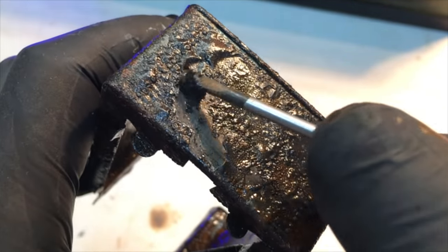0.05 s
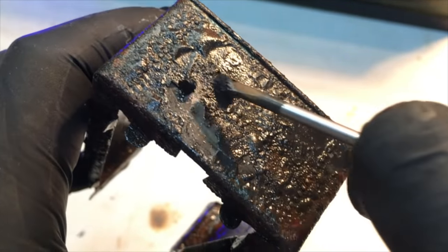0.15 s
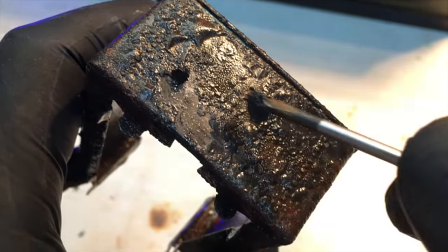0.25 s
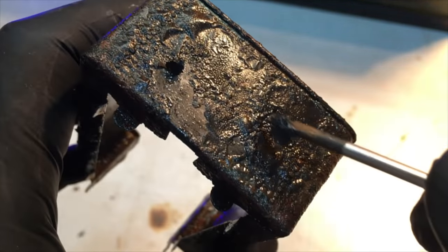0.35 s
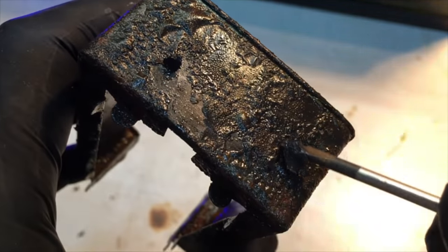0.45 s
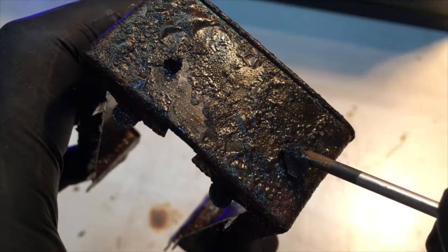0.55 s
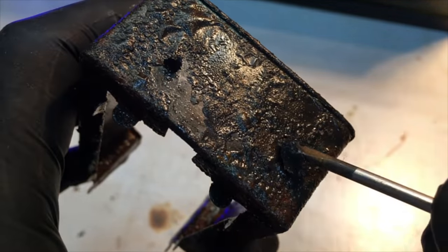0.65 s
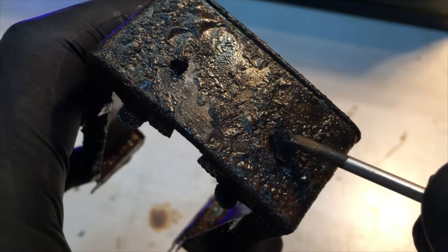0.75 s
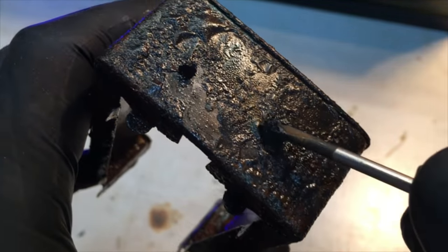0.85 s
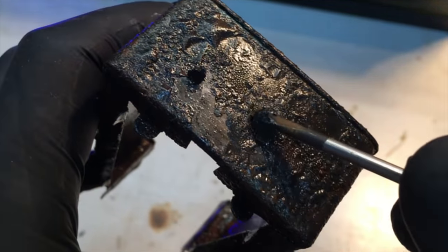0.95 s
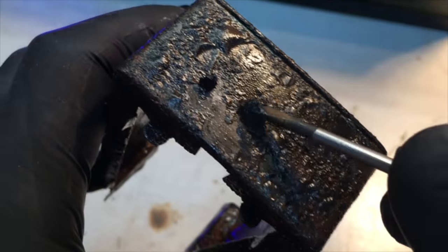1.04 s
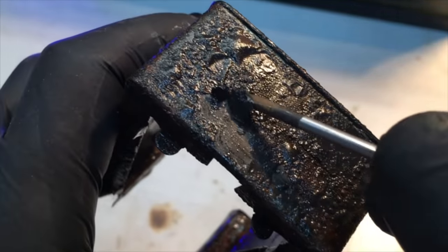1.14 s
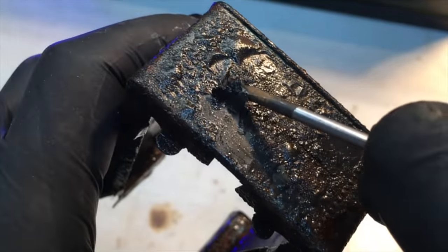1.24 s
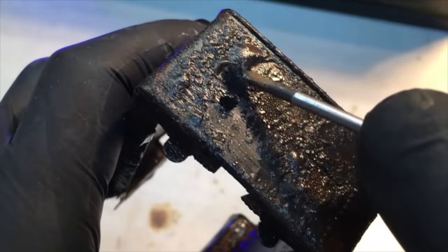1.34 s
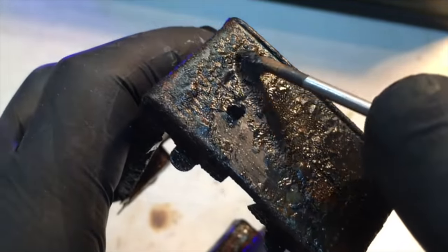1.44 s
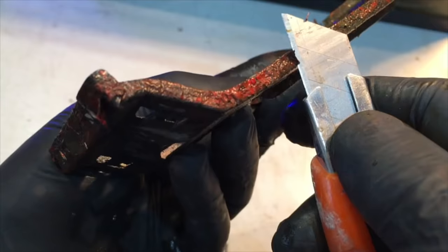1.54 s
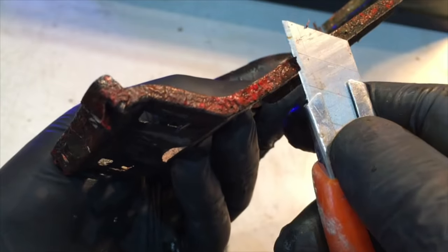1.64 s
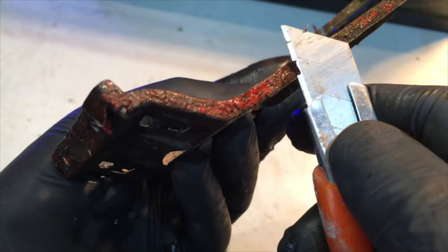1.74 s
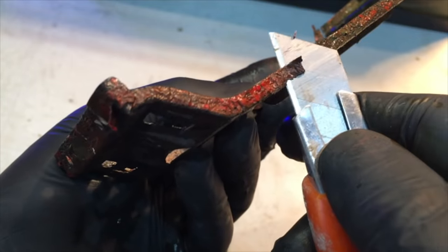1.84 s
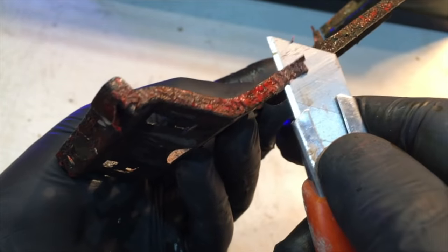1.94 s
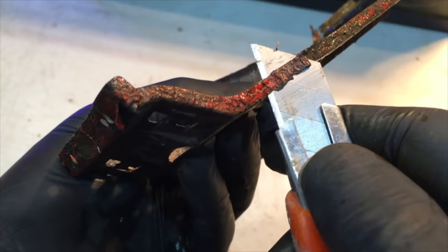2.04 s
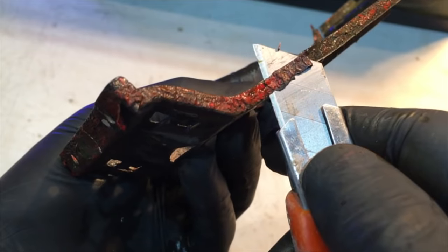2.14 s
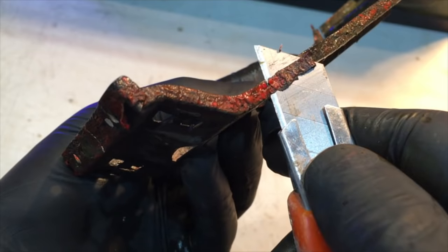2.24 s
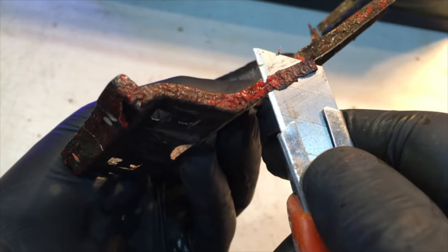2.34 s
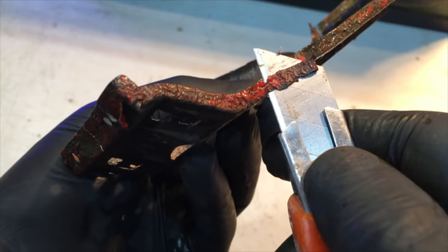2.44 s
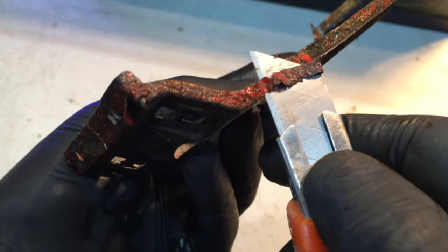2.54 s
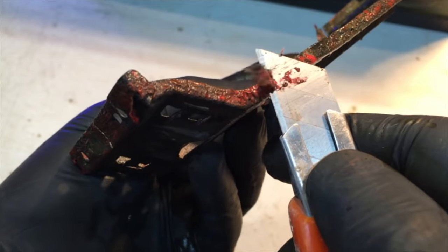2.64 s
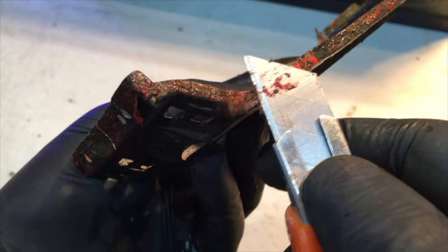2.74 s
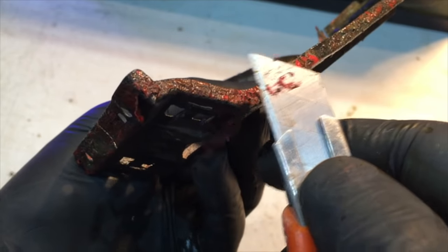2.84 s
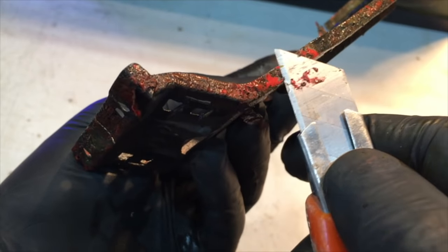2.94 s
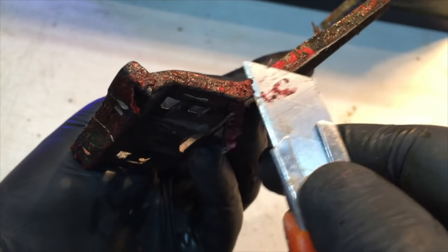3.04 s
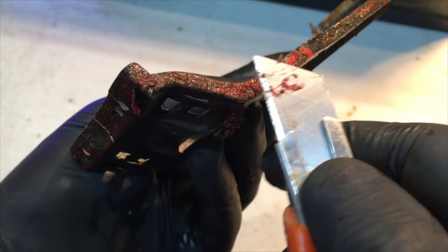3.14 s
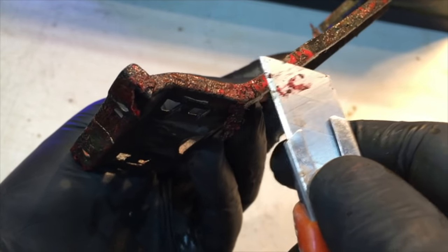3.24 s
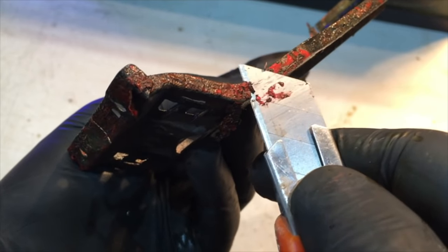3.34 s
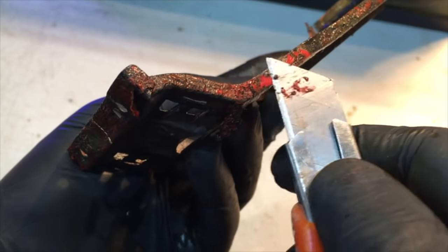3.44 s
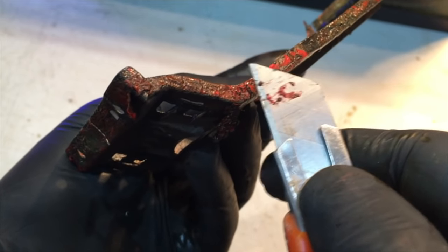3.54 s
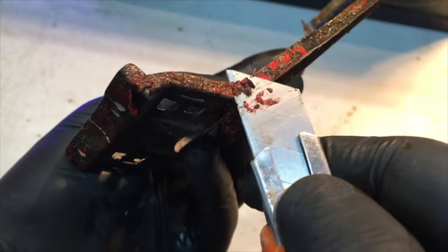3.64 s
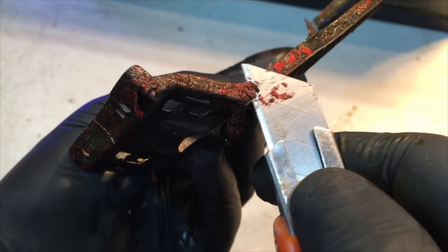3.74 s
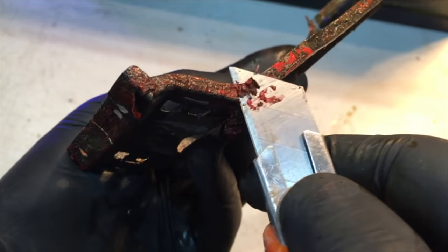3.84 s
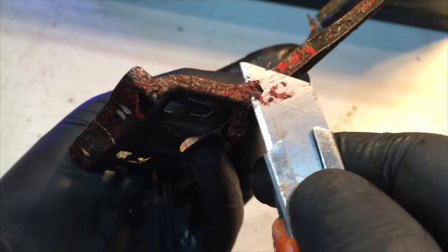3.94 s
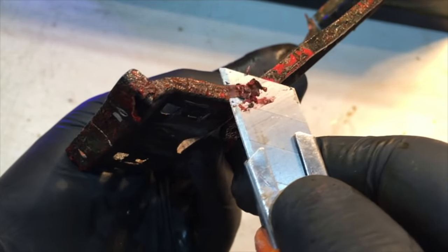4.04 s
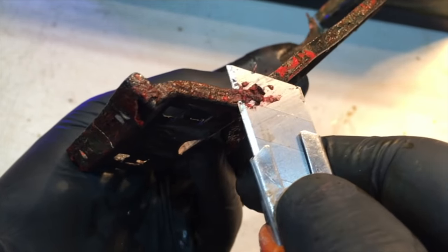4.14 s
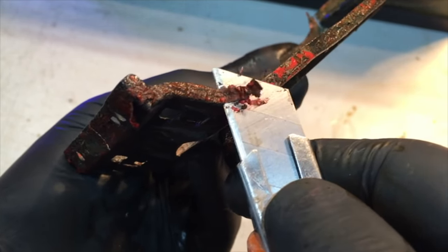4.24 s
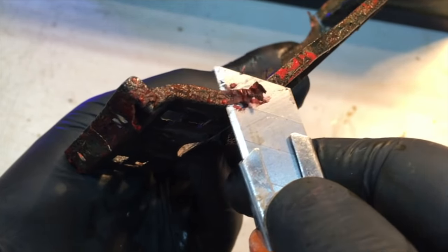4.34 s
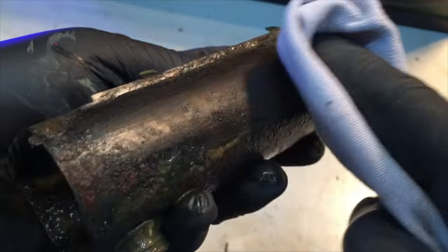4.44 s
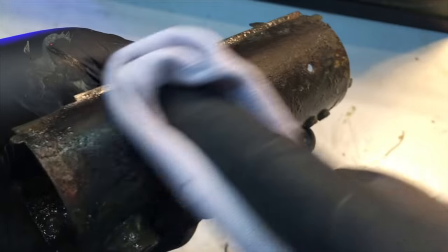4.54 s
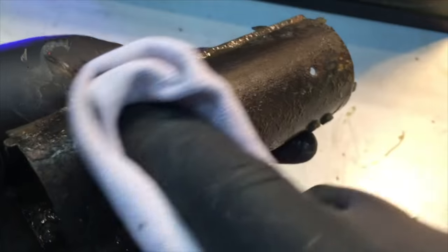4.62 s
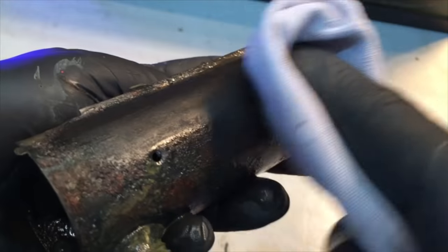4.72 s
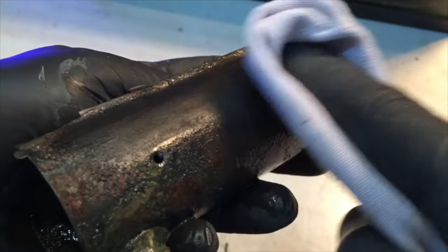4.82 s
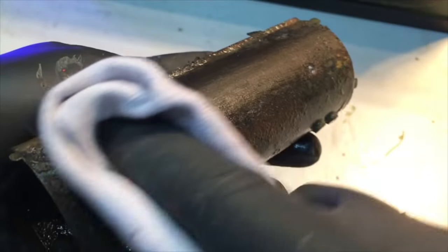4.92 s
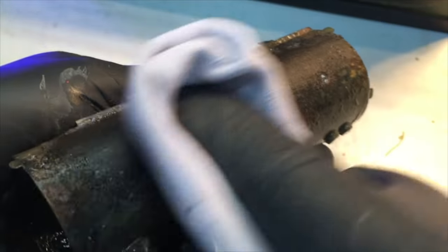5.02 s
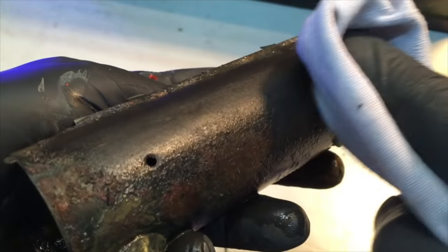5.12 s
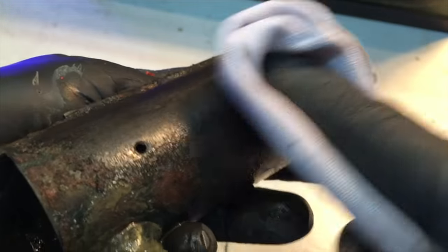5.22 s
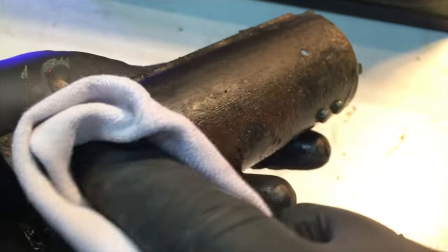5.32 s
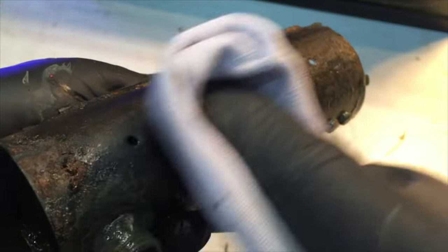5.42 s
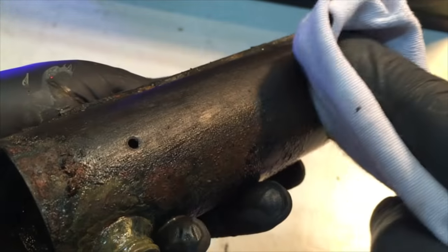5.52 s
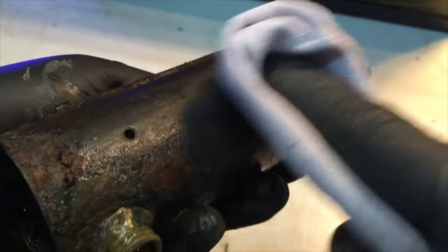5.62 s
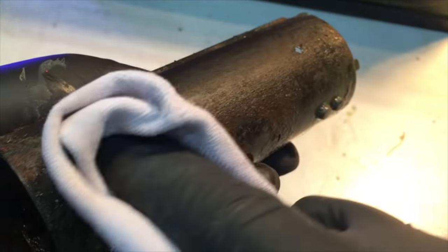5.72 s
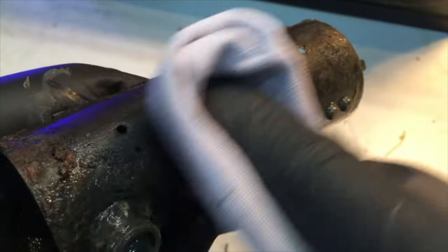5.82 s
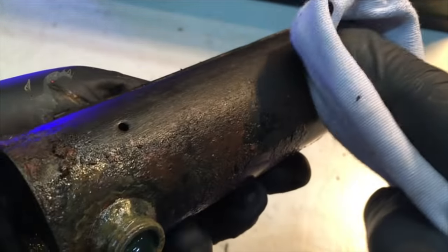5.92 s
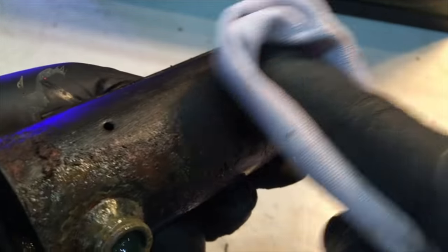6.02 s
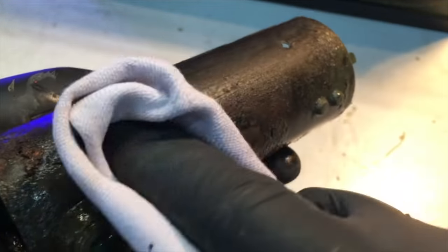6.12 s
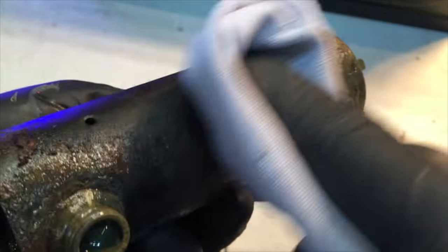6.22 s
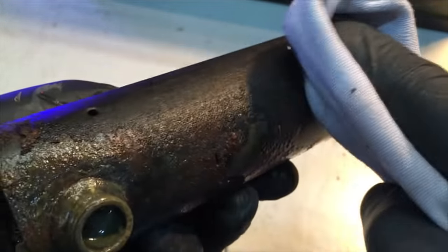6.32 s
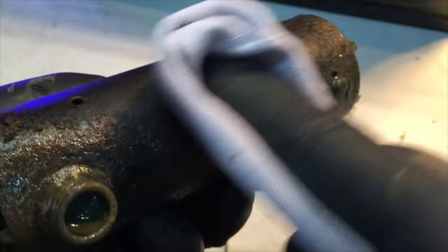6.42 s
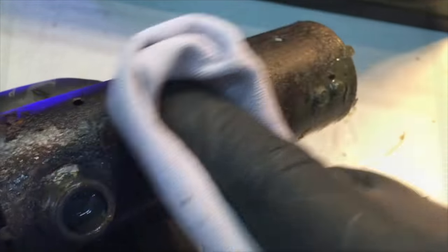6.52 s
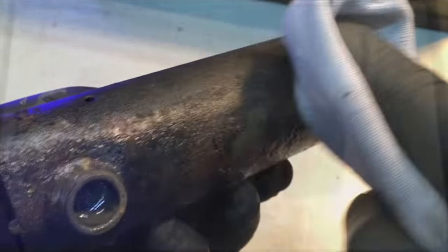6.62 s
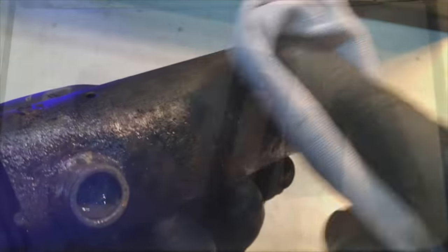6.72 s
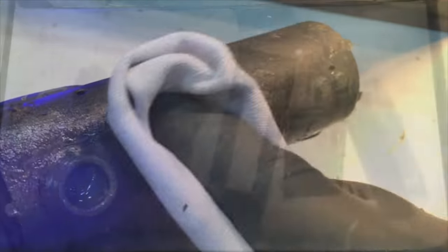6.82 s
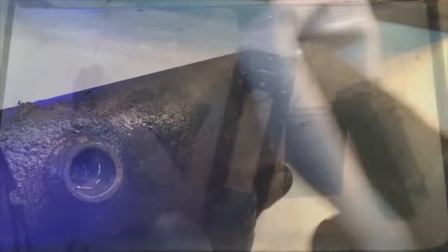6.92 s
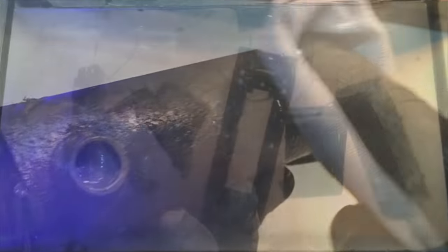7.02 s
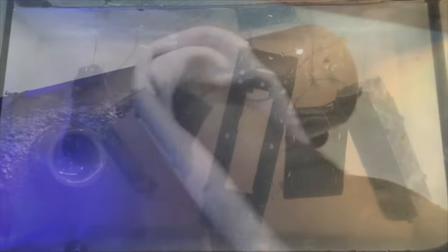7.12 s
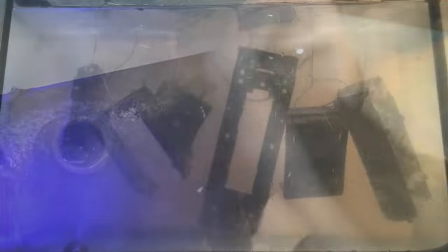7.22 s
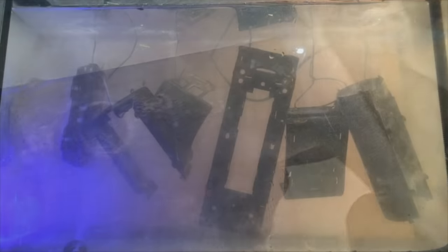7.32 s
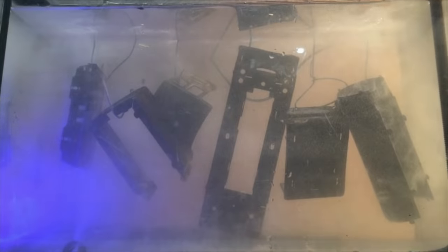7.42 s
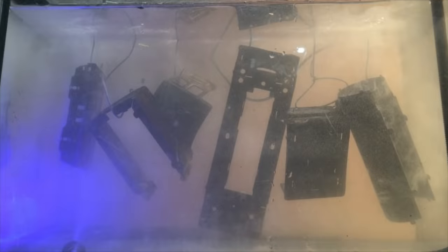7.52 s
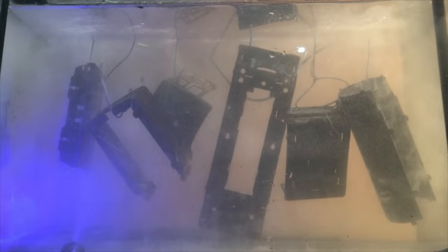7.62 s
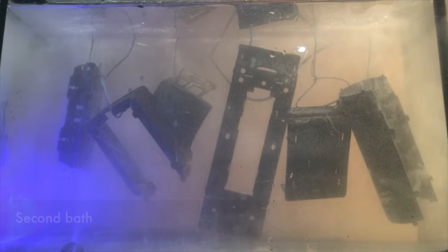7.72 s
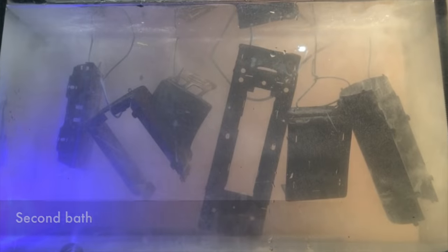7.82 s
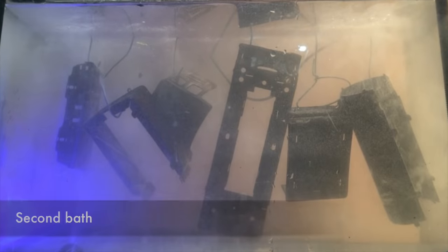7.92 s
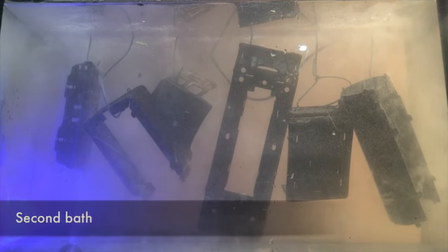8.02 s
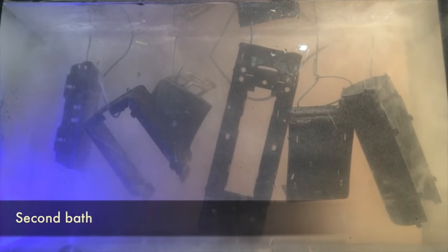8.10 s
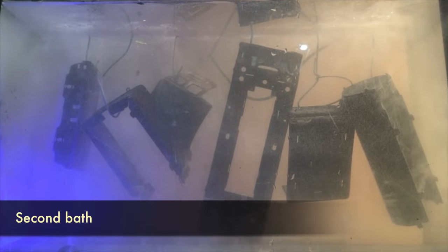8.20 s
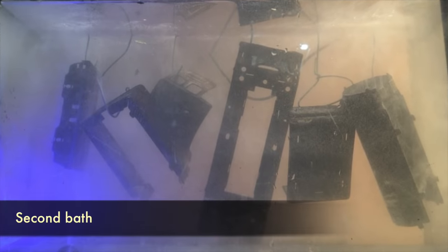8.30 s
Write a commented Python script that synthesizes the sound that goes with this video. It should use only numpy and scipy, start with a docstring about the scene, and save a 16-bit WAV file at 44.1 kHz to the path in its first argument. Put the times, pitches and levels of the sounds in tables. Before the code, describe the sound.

Dry, close bench sounds with little room echo: a stiff brush rubs and crackles on rusty metal, then a knife blade catches, judders and snaps through crust in uneven scratches. Next a rag swishes briskly to and fro along a rough tube, hissing with soft thumps. It dissolves into quiet background noise, tiny bursting bubbles and a wavering low hum with a faint high whine.

```python
"""A small workshop bench, close to one microphone: rusty metal parts are cleaned in three ways, then bathed.
A stiff brush works on blistered paint, its even rub ringing the plate, its catching bristles crackling. A blade
scrapes an edge in short slips of dense fractures, with sharp cracks. A rag scrubs a tube in bright pushes and heavier
pulls, its thread noise following hand speed; it fades into a rust bath of random fizz over noise and wavering hum."""
import sys
import numpy as np
from scipy import signal
from scipy.fft import rfft, irfft
from scipy.io import wavfile
from scipy.ndimage import map_coordinates

SR = 44100
rng = np.random.default_rng(int(sys.argv[2]) if len(sys.argv) > 2 else 0)


def master_out(mix):
    """Clip the mix to full scale and print it as 16-bit PCM to the path in sys.argv[1]."""
    frames = np.transpose(np.atleast_2d(mix))
    ceiling = np.clip(frames, -1, 1)
    pcm = np.round(ceiling * 32767).astype(np.int16)
    wavfile.write(sys.argv[1], SR, pcm)


N = 368676
TIME_S = np.arange(N) / SR
HZ = np.fft.rfftfreq(8192, 1 / SR)

# Stage times in seconds: blade starts, rag starts, fade to the bath starts, fade ends.
STAGE_TIMES_S = (1.55, 4.45, 6.55, 7.45)

# Background noise spectra of the four stages. Each row: frequency in Hz, relative density in dB per Hz.
BRUSH_AIR = [(8, -36), (25, -1.5), (52, -2), (163, -17), (500, -25.5), (900, -25.5), (1600, -23.5),
             (2100, -26), (3700, -27.5), (4900, -32.5), (9600, -35), (10400, -38), (12000, -35),
             (16000, -36)]
BLADE_AIR = [(8, -33), (25, 2.5), (45, 0.5), (75, -3), (135, -14), (220, -19.5), (330, -19), (700, -25.5),
             (2500, -26), (5000, -31.5), (16000, -36)]
RAG_AIR = [(20, 4), (35, -2), (100, -15), (200, -14), (1000, -24), (4000, -37), (16000, -36)]
BATH_AIR = [(12, -38), (20, 5), (60, -7.5), (101, 0), (130, -19), (216, -17), (262, -20.5), (660, -26.5),
            (825, -24.5), (2390, -27.5), (2670, -29), (3070, -22.5), (3740, -26.5), (6010, -31),
            (16000, -33)]
# Spectrum of the bath's bursting bubbles. Each row: frequency in Hz, relative gain in dB.
FIZZ = [(600, -28), (1300, 4.5), (2000, 5.5), (3200, -1), (4900, -10), (5900, 4), (7700, -7), (9300, 1.5),
        (10400, -8), (12000, -2), (16000, -16)]
# Steady tones at the bench and the bath. Each row: frequency in Hz, nominal rms level in dB.
BENCH_HUM = [(76.5, -71.5), (101.5, -75.5), (152.3, -76.5), (203, -87), (305, -84)]
BATH_HUM = [(32.3, -74.5), (102.3, -74.5), (222, -88), (2358, -78.5), (3144, -83), (3235, -105),
            (3435, -87)]

# Spectra of the cloth's threads and of the hand's thump. Each row: frequency in Hz, relative gain in dB.
RAG_THREADS = [(150, -42.5), (400, -17), (650, -17), (1200, -8.5), (1850, -8), (2700, -2), (4100, -2.5),
               (4880, -7), (5800, 4.5), (6700, 0), (9300, 1.5), (10400, -3), (11400, 0.5), (16000, 0)]
THUMP = [(30, -31), (70, 6), (110, 4.5), (170, -1.5), (250, 1.5), (400, -8.5), (700, -48), (2000, -56)]
# Starts of the rag's strokes in seconds, and the end of the last; pushes and pulls alternate, push first.
TURNS_S = [4.45, 4.634, 4.806, 4.99, 5.181, 5.37, 5.576, 5.774, 5.977, 6.168, 6.352, 6.529, 6.689, 6.857,
           7.012, 7.186, 7.325]
# Each direction, one row: swell with speed 0-1, then hiss, rasp and thump drive in dB.
PUSH = (0.55, -35, -45.5, -61)
PULL = (0.32, -37.5, -45, -58.5)
# Fade-out of the scrubbing. Each row: time in seconds, level in dB.
RAG_FADE = [(4.5, 0), (5.6, 0), (5.87, -1.5), (6.2, -3), (6.55, -7.5), (6.93, -16), (7.1, -23.5),
            (7.3, -30)]
# How strongly hiss, rasp and thump follow the fade: one factor each.
RAG_FOLLOW = (0.98, 0.87, 0.74)
TURN_REST_S, TURN_DRAG_DB = 0.03, -27  # the hand nearly rests at each turn; the cloth drags on faintly

# Resonances of the brushed plate. Each row: frequency in Hz, width in Hz, relative gain in dB.
PLATE_MODES = [(864, 310, 0.5), (1260, 170, 3.5), (1680, 410, -2.5), (2430, 430, 1.5), (3350, 320, 3),
               (3770, 560, 5), (4500, 380, -16), (5280, 810, -3), (6580, 1600, -4.5), (6940, 820, -25),
               (7560, 370, -34), (9100, 1700, -15), (11600, 600, -8.5), (13100, 910, -17)]
# Broad response of the plate, and spectrum of the bristles. Each row: frequency in Hz, relative gain in dB.
PLATE_BODY = [(250, -25), (520, -27), (750, 6), (2000, -13), (4000, 4), (8000, -21), (16000, -20)]
BRISTLES = [(1000, -21.5), (4000, -9.5), (6500, -6.5), (9000, 1), (10300, -2), (11500, 2.5), (15000, 0.5),
            (16500, 5.5)]
# Three brush sweeps, a curve each. Each row: time in seconds, relative rub level in dB, bristle crackle in dB.
SWEEPS = [
    [(0.62, -79, -95), (0.678, -55, -48), (0.69, -87, -90), (0.698, -56.5, -62), (0.788, -55.5, -53),
     (0.802, -60, -50), (0.808, -50.5, -49), (0.868, -48, -54), (0.88, -72, -89), (0.885, -74, -89)],
    [(0.885, -77, -89), (0.895, -56.5, -50), (0.907, -50.5, -46), (0.917, -64, -70), (0.971, -51, -57),
     (0.977, -67, -66), (1.027, -44.5, -57), (1.039, -58, -63), (1.163, -51.5, -61), (1.19, -86, -89)],
    [(1.19, -83, -89), (1.21, -56.5, -61), (1.238, -88, -89), (1.262, -59.5, -67), (1.354, -56, -39.5),
     (1.462, -54, -44), (1.468, -58, -50), (1.512, -51.5, -55), (1.532, -77, -62), (1.56, -60, -91)],
]
# Light touches before the sweeps. Each row: start in seconds, end in seconds, relative level in dB.
TOUCHES = [(0.004, 0.036, -62.5), (0.405, 0.436, -71), (0.494, 0.497, -55.5)]
# Single bristles flicking off the crust. Each row: time in seconds, relative level in dB.
FLICKS = [(0.8087, -33), (0.825, -31), (1.025, -33), (1.329, -30), (1.3612, -25), (1.3771, -25),
          (1.4232, -43), (1.4494, -30), (1.4556, -28.5)]

# Resonances of blade and part, far out on the arm and near its root.
# Each row: frequency in Hz, width in Hz, relative gain in dB.
ARM_MODES = [(1120, 260, -14.5), (1880, 330, -6), (2430, 270, 3.5), (2740, 190, 3), (3540, 410, -6.5),
             (4170, 530, -8), (4670, 130, -5), (5770, 370, -7), (6440, 400, -18), (7120, 390, -8),
             (8640, 1200, -17), (9350, 500, -24), (11230, 550, -13.5), (13000, 930, -19), (14650, 660, -16)]
ROOT_MODES = [(1124, 200, -10), (1910, 200, -2), (2604, 340, 3), (3240, 470, -3), (3620, 140, 0),
              (4050, 390, -5), (4500, 67, -14.5), (5380, 51, -4.5), (5900, 1700, -19), (7160, 430, -5),
              (7970, 700, -11), (8950, 500, -20), (9640, 440, -19), (10830, 270, -20.5), (11430, 490, -4.5),
              (12100, 490, -17), (13550, 520, -9.5), (15400, 500, -14), (15500, 790, -18)]
# Sharp cracks under the blade: brief catches, abrupt slip starts, snapping chips.
# Each row: time in seconds, relative level in dB, treble change in dB.
CRACKS = [(1.65, -45.5, -5.5), (1.7246, -32, -1), (1.766, -37.5, -17), (1.8688, -29.5, -9), (1.953, -42, 0),
          (2.22, -35, -10.5), (2.335, -48, -7), (2.463, -47.5, -19), (2.532, -31, -8), (2.538, -39, 0),
          (2.5418, -28.5, 4), (2.662, -45.5, -12), (3.085, -36, -6), (3.3141, -33.5, 5), (3.5537, -16.5, 2),
          (3.7006, -30.5, -9), (4.172, -46, -4), (4.193, -35, 0), (4.386, -39, 6)]
# Broad spectrum of a crack. Each row: frequency in Hz, relative gain in dB.
SNAP = [(100, -21.5), (500, -17.5), (800, -18), (2000, -5.5), (5000, -17.5), (12000, -8), (16000, -13)]
# Slips of the blade. Each row: start in seconds, end in seconds, relative level in dB,
# pressure change from start to end in dB.
SLIPS = [(1.776, 1.805, -31.5, 2), (1.815, 1.83, -36.5, -8), (1.841, 1.852, -33.5, 10),
         (1.953, 2.023, -35.5, -3), (2.212, 2.218, -47.5, -5), (2.276, 2.292, -56, 5),
         (2.533, 2.553, -34.5, -9), (2.559, 2.578, -41.5, 4), (2.705, 2.742, -43.5, 4),
         (2.857, 2.864, -58, 5), (2.959, 2.99, -47, 12), (2.989, 3.038, -37, -2),
         (3.036, 3.086, -46.5, -16), (3.116, 3.126, -43, 10), (3.148, 3.167, -42, 19),
         (3.201, 3.213, -47.5, -10), (3.24, 3.292, -39.5, 3), (3.313, 3.361, -57, -2),
         (3.376, 3.411, -61.5, -5), (3.411, 3.423, -35, 8), (3.441, 3.463, -34, -12), (3.497, 3.51, -41, 8),
         (3.511, 3.538, -35.5, -5.5), (3.55, 3.576, -39.5, 0), (3.584, 3.618, -34, -22),
         (3.622, 3.634, -38.5, 0), (3.67, 3.724, -43, -19), (3.761, 3.806, -34.5, 0.5),
         (3.87, 3.914, -43, 12), (3.963, 3.995, -34, 3), (4.002, 4.058, -41.5, -11),
         (4.09, 4.124, -49.5, 9), (4.189, 4.205, -36, 5), (4.205, 4.239, -43.5, 11),
         (4.275, 4.304, -52.5, 0), (4.34, 4.356, -51.5, 2), (4.362, 4.369, -42, 4), (4.385, 4.391, -38, 0),
         (4.397, 4.415, -46, -1)]
# Broad spectrum of the scraping. Each row: frequency in Hz, relative gain in dB.
SCRAPE = [(100, -44), (550, -11.5), (800, -15), (1050, 1), (1500, 0.5), (2000, 6.5), (3200, -4.5),
          (4900, -8.5), (7500, -16), (10400, -15), (12000, -15), (16000, -33)]
REGRIP_S = 2.9  # the blade works on the arm before this, near the root after


def amp(db):
    """Decibels to gain."""
    return 10 ** (np.asarray(db) / 20)


def evened(x):
    """Scales to rms 1."""
    return x / np.sqrt(np.mean(x ** 2) + 1e-20)


def shape(points, hz=HZ):
    """Gain of a spectrum, joined on a log-frequency axis."""
    point_hz, db = np.transpose(points)
    return amp(np.interp(np.log(hz + 1), np.log(point_hz), db))


def ringing(modes):
    """Gain of a set of steep resonances, summed in power."""
    power = 0
    for mode_hz, width_hz, db in modes:
        detuning = (HZ ** 2 - mode_hz ** 2) / (width_hz * (HZ + 1))
        power = power + amp(db) ** 2 / (1 + detuning ** 2) ** 2
    return np.sqrt(power)


def halves(gain, split_hz):
    """The parts of a spectrum below and above a frequency."""
    ratio = (HZ / split_hz) ** 6
    return gain / np.hypot(1, ratio), gain * ratio / np.hypot(1, ratio)


def colour(x, gain):
    """Minimum-phase filter of unit energy: every click rings after it lands."""
    log_gain = np.log(np.maximum(gain / gain.max(), 1e-5))
    mirrored = np.r_[log_gain, log_gain[-2:0:-1]]
    taps = np.fft.ifft(np.exp(np.conj(signal.hilbert(mirrored)))).real[:len(HZ)]
    return signal.oaconvolve(x, taps / np.linalg.norm(taps))[:N]


def wander(rate_hz):
    """Slow random drift of rms 1."""
    lowpass = 1 / (1 + (np.fft.rfftfreq(N, 1 / SR) / rate_hz) ** 4)
    return evened(irfft(rfft(rng.standard_normal(N)) * lowpass, N))


def grains(per_s, spread_db):
    """Random clicks of uneven size, rms 1."""
    size = amp(spread_db * np.clip(rng.standard_normal(N), -2, 2)) * rng.choice([-1., 1.], N)
    return evened(size * (rng.random(N) < per_s / SR))


def add(mix, start_s, sound):
    """Mixes a sound in at a time."""
    part = mix[max(round(start_s * SR), 0):][:len(sound)]
    part += sound[:len(part)]


def stroke(source, start_s, end_s, rise_s, fall_s, change_db=0):
    """Start time and sound of one contact cut from a friction source; rms 1 over its nominal length."""
    first = max(int((start_s - rise_s) * SR), 0)
    span = slice(first, int((end_s + 10 * fall_s) * SR))
    t = TIME_S[span]
    onset = np.clip((t - start_s + rise_s) / (2 * rise_s), 0, 1) ** 2
    release = np.exp(-np.maximum(t - end_s + fall_s / 2, 0) / fall_s)
    pressure = amp(np.interp(t, [start_s, end_s], [0, change_db]))
    sound = source[span] * onset * release * pressure
    return first / SR, sound * np.sqrt((end_s - start_s) * SR / (np.sum(sound ** 2) + 1e-9))


def rebound(x, count):
    """Waves return from the part's edges after delays redrawn at each call; power is kept."""
    y = x.copy()
    for delay_s, share in zip(rng.uniform(.0003, .003, count), rng.choice([-.3, .3], count)):
        add(y, delay_s, share * x)
    return evened(y) * np.sqrt(np.mean(x ** 2))


def air(points, rms_db):
    """Steady background noise: Gaussian noise shaped in frequency."""
    gain = shape(points, np.fft.rfftfreq(N, 1 / SR))
    return amp(rms_db) * evened(irfft(rfft(rng.standard_normal(N)) * gain, N))


def hum(tones, flutter_db=1.0):
    """Machine tones that waver a little in level and phase."""
    total = np.zeros(N)
    for hz, db in tones:
        phase = 2 * np.pi * hz * TIME_S + .1 * wander(4)
        total += amp(db + flutter_db * wander(4)) * np.sqrt(2) * np.sin(phase)
    return total


def faint_fizz():
    """Faint fizz behind the brush, perhaps a bath nearby: sparse random clicks."""
    return amp(-75.5) * colour(grains(380, 6.5), shape(BRISTLES))


def bath_fizz():
    """Tiny bubbles burst: dense random clicks."""
    return amp(-71) * colour(grains(6000, 3.4), shape(FIZZ))


def background():
    """Each stage has its own air; the last dissolves into the bath."""
    blade_on, rag_on = (np.clip((TIME_S - s) / .02 + .5, 0, 1) for s in STAGE_TIMES_S[:2])
    bath_on = np.interp(TIME_S, STAGE_TIMES_S[2:], [0, 1])
    brush_stage = air(BRUSH_AIR, -64.5) + faint_fizz()
    blade_stage = air(BLADE_AIR, -63.5) + hum(BENCH_HUM)
    rag_stage = air(RAG_AIR, -68.5)
    bath_stage = air(BATH_AIR, -63.5) + hum(BATH_HUM) + bath_fizz()
    return ((1 - blade_on) * brush_stage + (blade_on - rag_on) * blade_stage
            + rag_on * (1 - bath_on) * rag_stage + bath_on * bath_stage)


def room(x, t60_s=0.12, late_t60_s=0.23):
    """A small workshop: sparse random reflections, a dulled part and two full-band decays."""
    t = TIME_S[:SR // 2]
    taps = rng.standard_normal(len(t)) * (rng.random(len(t)) < 3000 / SR) * (t > .003)
    dull = signal.sosfilt(signal.butter(2, 4500, fs=SR, output="sos"), taps)
    tail = (dull + 1.1 * taps) * amp(-60 * t / t60_s) + 2.6 * taps * amp(-60 * t / late_t60_s)
    return signal.oaconvolve(x, tail / np.linalg.norm(tail))[:N]


def rag_drive(lean_db=0.4, break_free=6):
    """Friction of hiss, rasp and thump: rises with hand speed, almost stops at each turn."""
    drive = np.zeros((3, N))
    steepness = np.array([[2.1], [1.6], [.9]])  # hiss needs more speed than rasp and thump do
    for k, (start_s, end_s) in enumerate(zip(TURNS_S, TURNS_S[1:])):
        swell, *levels_db = PULL if k % 2 else PUSH
        progress = (TIME_S - start_s - TURN_REST_S / 2) / (end_s - start_s - TURN_REST_S)
        near = abs(progress - .5) < .75
        u = progress[near]
        travelled = np.clip(u, 0, 1)
        speed = abs(np.sin(np.pi * travelled))
        press = amp(lean_db * (travelled + 2))  # the hand leans in as the stroke goes on
        drag = amp(TURN_DRAG_DB) * signal.windows.tukey(len(speed), .25)
        # the cloth breaks free quickly, then grows slowly louder with speed
        loose = np.tanh(break_free * speed ** steepness)
        friction = loose * (1 - swell + swell * speed ** 2) * press + drag
        rms = np.sqrt(np.mean(friction[:, abs(u - .5) < .5] ** 2, axis=1))
        drive[:, near] += (amp(levels_db) / rms)[:, None] * friction
    fade_db = np.interp(TIME_S, *np.transpose(RAG_FADE))
    return drive * amp(np.outer(RAG_FOLLOW, fade_db))


def rag(echo_gain=0.026, near_s=0.00056, travel_s=0.00049):
    """Threads rasp over the tube, the hand thumps, and the bench echoes the cloth."""
    hiss_drive, rasp_drive, thump_drive = rag_drive()
    threads = grains(22000, 3.3) * amp(0.64 * wander(84))
    low, high = halves(shape(RAG_THREADS), 4160)
    hiss = amp(0.71 * wander(54)) * colour(threads * hiss_drive, high)
    rasp = amp(1.36 * wander(28)) * colour(threads * rasp_drive, low)
    cloth = hiss + rasp
    # the echo off the bench lengthens and shortens as the rag travels to and fro
    place = np.interp(TIME_S, TURNS_S, np.arange(len(TURNS_S)) % 2)
    echo = map_coordinates(cloth, [(TIME_S - near_s - travel_s * place) * SR], order=3)
    thump = amp(3.3 * wander(18)) * colour(rng.standard_normal(N) * thump_drive, shape(THUMP))
    return cloth + echo_gain * echo + thump


def brush(rub_trim_db=-1, flick_trim_db=2, body_db=-9, touch_crackle_db=-2, skip_hz=45, skip_db=1.5):
    """Many bristles rub the plate evenly; a few catch on the crust in clumps and crackle."""
    skipping = amp(skip_db * wander(skip_hz))
    rubbing = evened(skipping * grains(12000, 3) * amp(1.5 * wander(130)))
    catches = evened(skipping * grains(5000, 9.9) * amp(3.9 * wander(150)))
    rub, crackle = np.zeros((2, N))
    for sweep in SWEEPS:
        times_s, rub_db, catch_db = np.transpose(sweep)
        touching = (TIME_S > times_s[0]) & (TIME_S < times_s[-1])
        rub_gain = amp(np.interp(TIME_S, times_s, rub_db) + rub_trim_db)
        rub += touching * rub_gain * rebound(rubbing, count=2)
        crackle += touching * amp(np.interp(TIME_S, times_s, catch_db)) * catches
    for start_s, end_s, db in TOUCHES:
        first_s, sound = stroke(rubbing, start_s, end_s, 0.0011, 0.0035)
        add(rub, first_s, amp(db) * sound)
        add(crackle, first_s, amp(db + touch_crackle_db) * sound)
    t = TIME_S[:200]
    for s, db in FLICKS:
        add(crackle, s, amp(db + flick_trim_db) * np.exp(-t / 0.00052) * rng.standard_normal(len(t)))
    plate = ringing(PLATE_MODES) + amp(body_db) * shape(PLATE_BODY)
    return colour(rub, plate) + colour(crackle, shape(BRISTLES))


def sharp_cracks(rows, modes, jolt_db, snap_db=-3, ring_db=-2, crack_db=-4, t60_s=0.017):
    """A catch, abrupt slip start or snapping chip: a decaying noise burst rattles part and hand."""
    cracks, edges = np.zeros((2, N))
    t = TIME_S[:SR // 20]
    for s, db, bright_db in rows:
        crack = amp(db - 60 * t / t60_s) * rng.standard_normal(len(t))
        add(cracks, s, crack)
        add(edges, s, amp(bright_db) * crack)
    low, high = halves(ringing(modes) + amp(snap_db) * shape(SNAP), 4350)
    ring = amp(ring_db) * colour(cracks, low)
    return ring + amp(crack_db) * colour(edges, high) + amp(jolt_db) * colour(cracks, shape(THUMP))


def chatter(x, hz, width_hz):
    """The blade's own springy resonance, at the power that went in."""
    r = np.exp(-np.pi * width_hz / SR)
    y = signal.lfilter([1, 0, -1], [1, -2 * r * np.cos(2 * np.pi * hz / SR), r * r], x)
    return evened(y) * np.sqrt(np.mean(x ** 2))


def new_contact(modes):
    """A new contact point detunes the resonances and drives them by other amounts."""
    contact = rng.standard_normal((len(modes), 2)) * [.012, 2]  # detuning ratio, drive in dB
    return [(hz * (1 + detune), width_hz, db + drive_db)
            for (hz, width_hz, db), (detune, drive_db) in zip(modes, contact)]


def blade(slips, modes, body_db, low_db, grit_db, chatter_db, push_db, swell, grit_direct_db=-23.5):
    """The edge sticks and slips through paint: dense fractures drive blade and part, and push the hand."""
    fractures = grains(7000, 2.7) * amp(3.2 * np.tanh(wander(220)))
    mix, push = np.zeros((2, N))
    body = amp(body_db) * shape(SCRAPE)
    for start_s, end_s, db, change_db in slips:
        length_s = end_s - start_s
        rise_s, fall_s = 0.000057 + swell * length_s, 0.00056 + 0.01 * length_s
        first_s, sound = stroke(fractures, start_s, end_s, rise_s, fall_s, change_db)
        sound = rebound(sound, count=2)
        treble_db = grit_db + 1.86 * rng.standard_normal()
        # the blade's resonance shifts a little with every slip
        chatter_hz = 2640 * (1 + 0.038 * rng.standard_normal())
        response = ringing(new_contact(modes)) + body
        low = halves(response, 4200)[0]
        # some treble reaches the air without ringing the part
        high = halves(response + amp(grit_direct_db), 3910)[1]
        judder = 0.59 * sound + amp(chatter_db) * chatter(sound, chatter_hz, 1180)
        add(mix, first_s, amp(db + low_db) * colour(judder, low))
        add(mix, first_s, amp(db + treble_db) * colour(sound, high))
        add(push, first_s, amp(db + push_db) * sound)
    return mix + colour(push, shape(THUMP))


def scraping():
    """Blade slips and sharp cracks, first out on the arm, then near its root."""
    arm_slips = [row for row in SLIPS if row[0] < REGRIP_S]
    root_slips = [row for row in SLIPS if row[0] >= REGRIP_S]
    # out on the arm the blade bites at once; near the root it eases into each slip
    on_arm = blade(arm_slips, ARM_MODES, body_db=-10.5, low_db=-3.5, grit_db=-6.5,
                   chatter_db=-13.5, push_db=-30.5, swell=0.016)
    at_root = blade(root_slips, ROOT_MODES, body_db=-8.5, low_db=-3, grit_db=-8,
                    chatter_db=-13.5, push_db=-33.5, swell=0.11)
    # the arm is a lever: a crack out there jolts the hand more
    on_arm += sharp_cracks([row for row in CRACKS if row[0] < REGRIP_S], ARM_MODES, jolt_db=-17.5)
    at_root += sharp_cracks([row for row in CRACKS if row[0] >= REGRIP_S], ROOT_MODES, jolt_db=-30)
    return on_arm + at_root


def scene():
    """All the work happens close to one microphone, the same in both ears."""
    hard, soft = scraping(), brush() + rag()
    reflections = room(amp(-17.5) * hard + amp(-25) * soft)
    mono = hard + soft + reflections + background()
    return np.array([mono, mono])


def record(dry):
    """The recorder's band limit: a linear-phase low-pass."""
    taps = signal.firwin(401, 15850, window=("kaiser", 8), fs=SR)
    return signal.oaconvolve(dry, taps[None], "same")


dry = scene()
out = record(dry)
master_out(out)
```